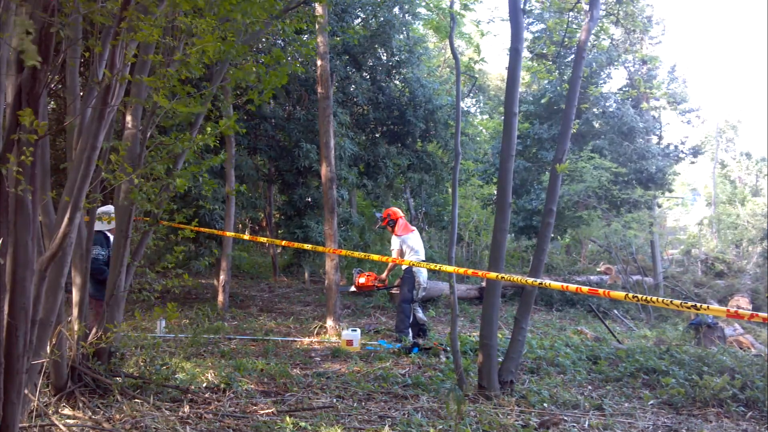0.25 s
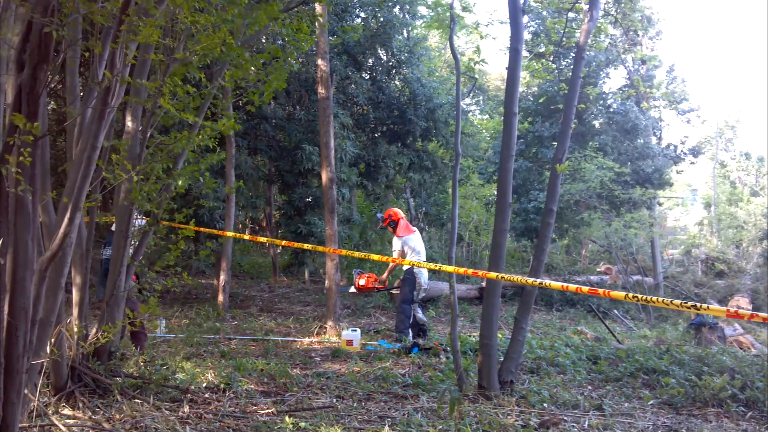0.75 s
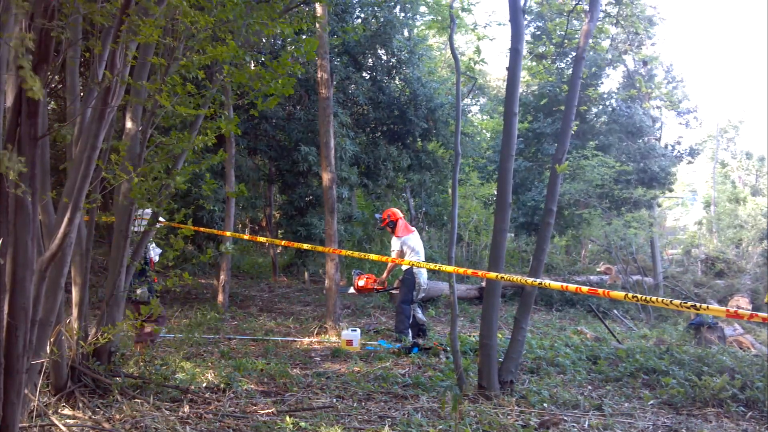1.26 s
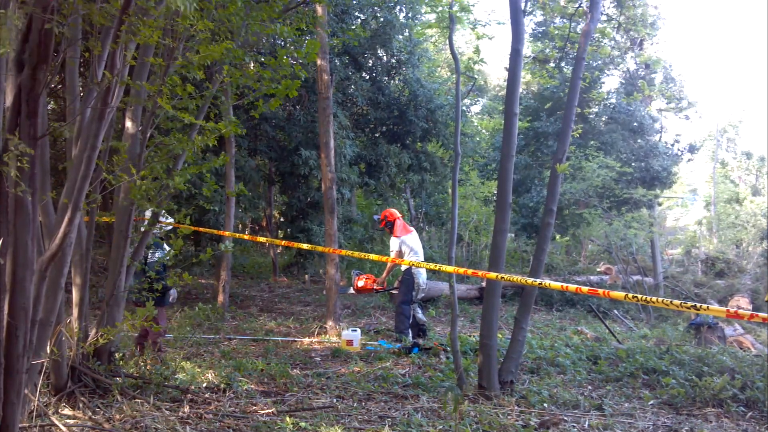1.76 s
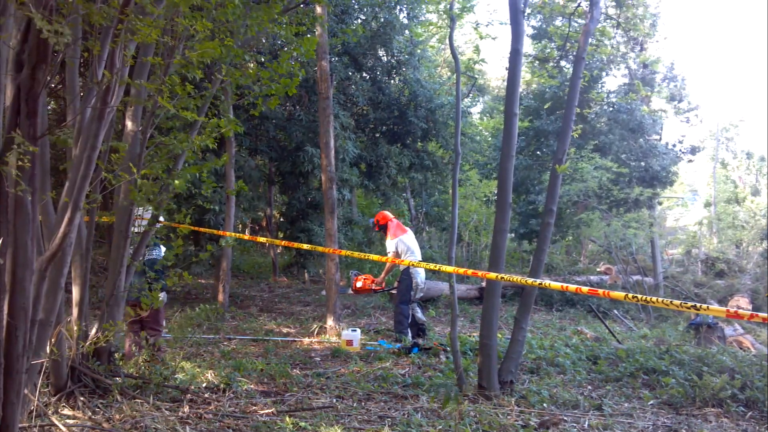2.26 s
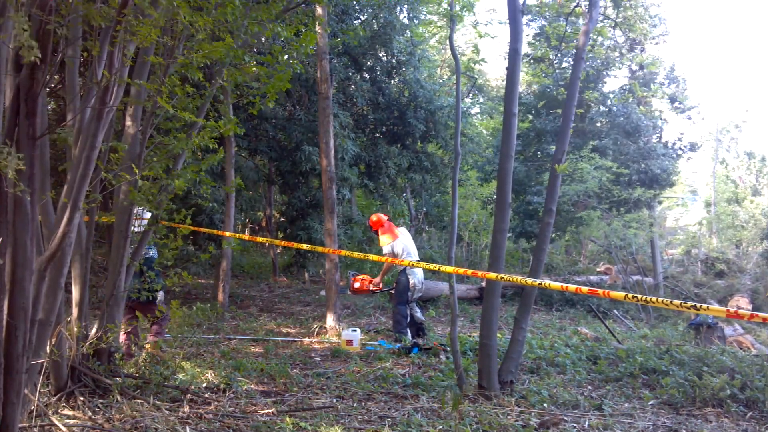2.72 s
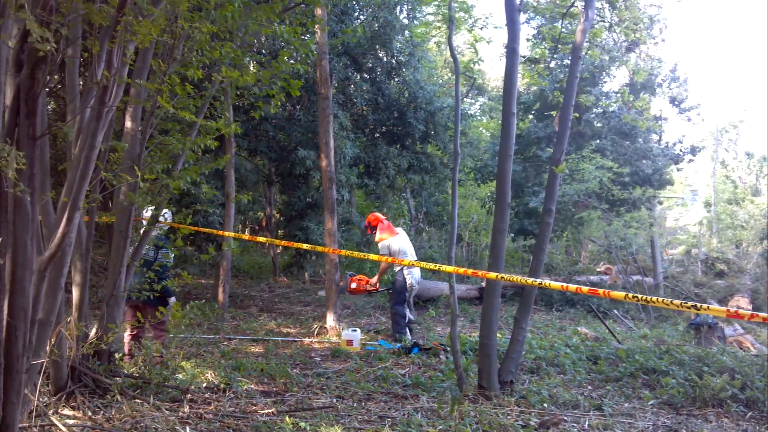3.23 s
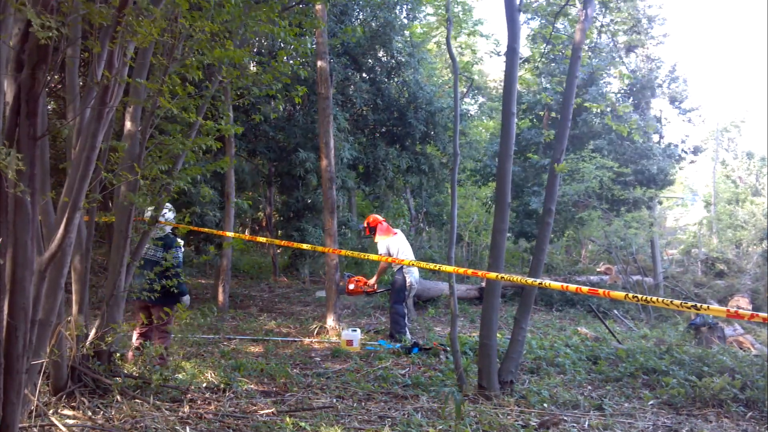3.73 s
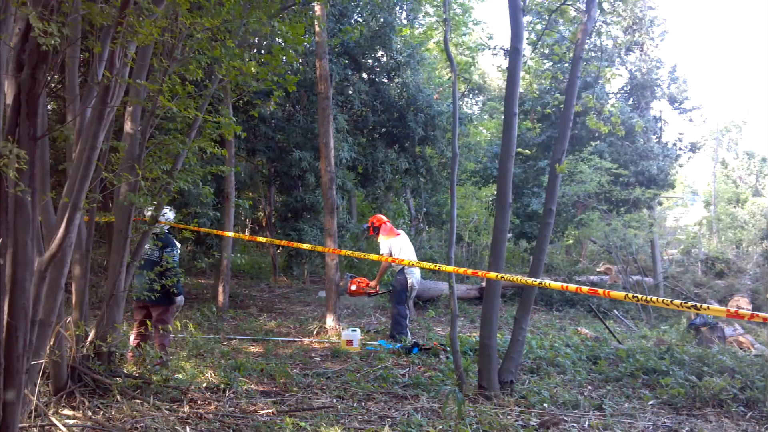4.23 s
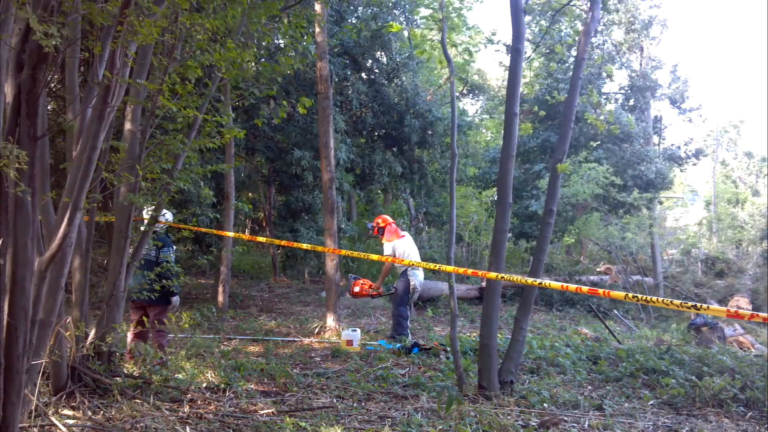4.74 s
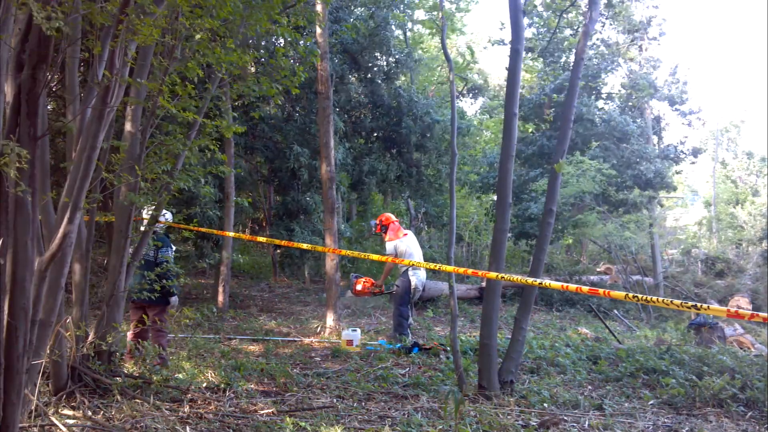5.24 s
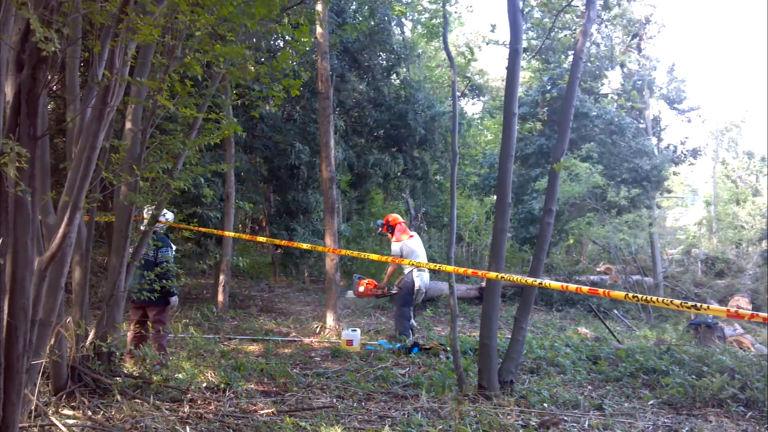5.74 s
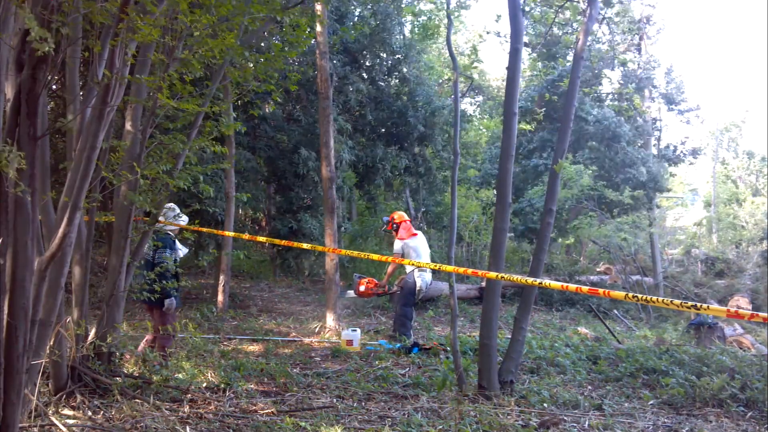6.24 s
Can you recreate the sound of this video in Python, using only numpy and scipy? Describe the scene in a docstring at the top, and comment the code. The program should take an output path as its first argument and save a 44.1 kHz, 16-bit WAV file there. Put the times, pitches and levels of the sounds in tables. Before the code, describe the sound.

A petrol chainsaw works at a trunk in open woodland, heard from some metres away in stereo. It putters at idle, picks up and cuts with a lumpy, stuttering drone, then revs into a loud even rasp, drops off and barks in three quick blips. Chain hiss and casing rattle follow the revs; soft low thumps and light wind bump the microphone, and a few twigs snap.

```python
"""In woodland, some metres from a stereo microphone, a two-stroke chainsaw works at a tree trunk.
On part throttle it mostly fires strongly only every second or third turn; then it revs up cleanly,
coasts down and is blipped three times. Impulses timed by the crank excite muffler and casing filters.
Filtered noise makes the chain's hiss, scattering trunks, snapping twigs and air on the microphone;
decaying tones in puffs of noise make soft thumps there."""
import sys
import numpy as np
from scipy import signal
from scipy.fft import rfft, irfft, next_fast_len
from scipy.io import wavfile
from scipy.ndimage import uniform_filter1d, map_coordinates

SR = 44100
rng = np.random.default_rng(int(sys.argv[2]) if len(sys.argv) > 2 else 0)


def digitize_waveform(pressure):
    """Quantize a signal to 16-bit integers and store it at the path in sys.argv[1].

    Rows of a 2-D input are taken as channels; values are limited to [-1, 1].
    """
    field = np.atleast_2d(pressure).T
    bounded = np.clip(field, -1, 1)
    quanta = np.round(bounded * 32767).astype(np.int16)
    wavfile.write(sys.argv[1], SR, quanta)


N = 285768

# spectral colour of the chain links, also lent to the twigs: f/Hz, relative level/dB
CHAIN_COLOUR = [(500, -9), (2000, -3.5), (3200, 0.5), (5000, 1), (6300, -2), (7200, 0), (9000, 1.5),
                (11000, -1.5), (13500, -4), (15000, -11), (16000, -25)]
# throttle blips: opening t/s, stumble duration/s, swell duration/s, closing t/s, exhaust level/dB
THROTTLE_BLIPS = [(5.55, 0.13, 0.12, 5.912, -16.5), (6.076, 0.0038, 0.035, 6.247, -15.5),
                  (6.441, 0.0067, 0.036, 6.507, -15)]
BITE_S, LIFT_S = 0.82, 5.11  # the chain enters the wood; the throttle is let go


def amp(db):
    """Decibels to amplitude ratio: 20 dB is a factor of ten."""
    return 10 ** (np.asarray(db) / 20)


def unit(x):
    """Normalise the mean square, so that x has rms 1."""
    return x / np.sqrt(np.mean(x ** 2) + 1e-20)


def along(points, hz):
    """Interpolate (f, value) points linearly on a logarithmic frequency axis."""
    f, v = np.transpose(points)
    return np.interp(np.log(hz + 1), np.log(f + 1), v)


def curves(rows):
    """Interpolate each column after the time linearly, one value per sample."""
    s, *columns = np.transpose(rows)
    return [np.interp(np.arange(N) / SR, s, column) for column in columns]


def wobble(rate):
    """Band-limited random fluctuation: a spline through rate random knots a second."""
    knots = rng.standard_normal(int(N * rate / SR) + 4)
    return map_coordinates(knots, [np.arange(N) * rate / SR])


def filtered(x, response):
    """Linear filtering: multiply the spectrum of x by a response of frequency."""
    m = next_fast_len(N + SR // 2)
    spectrum = rfft(x, m) * response(np.fft.rfftfreq(m, 1 / SR))
    return irfft(spectrum, m)[..., :N]


def coloured(x, points):
    """Spectral shaping by (f/Hz, level/dB) points, normalised to rms 1."""
    return unit(filtered(x, lambda hz: amp(along(points, hz))))


def ring(points, size=4096):
    """Minimum-phase impulse response of a (f/Hz, level/dB) colour, from its folded cepstrum."""
    cepstrum = irfft(np.log(amp(along(points, np.fft.rfftfreq(size, 1 / SR)))))
    cepstrum[1:size // 2] *= 2
    cepstrum[size // 2 + 1:] = 0
    return irfft(np.exp(rfft(cepstrum)))


def steady(x, size=4400):
    """Level equalisation: divide x by its short-time rms."""
    power = np.mean(np.atleast_2d(x) ** 2, axis=0)
    smooth_power = uniform_filter1d(uniform_filter1d(power, size), size // 2)
    return x / np.sqrt(np.abs(smooth_power) + 1e-12)


def ports(far_db):
    """Level difference between the left and right microphone ports, at equal mean power."""
    return unit(np.array([[1], [amp(far_db)]]))


def impulses(seconds, size):
    """Fractional delay: share each impulse linearly between two neighbouring samples."""
    at = np.clip(seconds * SR, 0, N - 2)
    whole = at.astype(int)
    early = np.bincount(whole, size * (1 - at + whole), N)
    late = np.bincount(whole + 1, size * (at - whole), N)
    return early + late


def by_speed(speed, top_db, knee_hz, db_per_octave):
    """Power law of source level: so many decibels per octave of crank speed, up to a knee."""
    return top_db + db_per_octave * np.log2(np.minimum(speed / knee_hz, 1))


def gate(start, end, rise, fall):
    """Envelope from 0 to 1: a linear ramp from start, an exponential relaxation after end."""
    t = np.arange(N) / SR
    return np.clip((t - start) / rise, 0, 1) * np.exp(-np.maximum(t - end, 0) / fall)


def shaking(fire, decay, share):
    """Damped vibration envelope: each firing jolts the saw, and the jolt dies away exponentially."""
    jolts = signal.fftconvolve(fire, np.exp(-np.arange(SR // 20) / SR / decay))[:N]
    share = np.clip(share, 0, 1)
    return steady(1 - share + share * steady(jolts))


def breeze():
    """Turbulent pressure at the microphone: flickering low noise whose power swells in Gaussian gusts."""
    # gusts: centre t/s, half length/s, peak level before flutter/dB
    gusts = [(0.12, 0.15, -40), (0.595, 0.41, -32.5), (1.75, 0.38, -37), (3.097, 0.35, -36),
             (5.897, 0.32, -31)]
    # spectral colour of the moving air: f/Hz, relative level/dB
    air_colour = [(25, -50), (60, -11.5), (120, -5), (250, -11), (600, -18.5), (2000, -34), (15000, -36)]
    breeze_db = -43.5  # between gusts, before flutter
    t = np.arange(N) / SR
    power = amp(breeze_db) ** 2
    for s, half, db in gusts:
        power = power + amp(db) ** 2 * np.exp(-((t - s) / half) ** 2)
    flutter_db = 3 * wobble(14)
    air = coloured(rng.standard_normal((2, N)), air_colour)
    return np.sqrt(power) * amp(flutter_db) * air * ports(far_db=-0.5)


def woods(x):
    """Diffuse reverberation: trunks and leaves scatter noise tails, one to each port."""
    # decay time of the scattered sound: f/Hz, t60/s
    decay_times = [(150, 0.64), (800, 0.31), (4000, 0.2), (14000, 0.055)]
    hz, t, z = signal.stft(rng.standard_normal((2, SR // 2)), SR, nperseg=256)
    decay = amp(-60 * t / along(decay_times, hz)[:, None])
    tail = signal.istft(z * decay, SR, nperseg=256)[1]
    return signal.fftconvolve(x[None], tail / np.linalg.norm(tail[0]), axes=1)[:, :N]


def twigs(t60=0.038):
    """Brittle fracture: dry twigs crack on the forest floor in sudden noise that decays exponentially."""
    # cracks: onset t/s, relative level/dB
    cracks = [(0.0764, -22), (0.1426, -25.5), (0.317, -21.5), (0.376, -17), (5.587, -16), (5.6264, -13.5)]
    envelope, t = np.zeros(N + SR), np.arange(SR // 8) / SR
    for s, db in cracks:
        envelope[round(s * SR):][:len(t)] += amp(db - 8 - 60 * t / t60)
    noise = coloured(rng.standard_normal((2, N)), CHAIN_COLOUR)
    return envelope[:N] * noise * ports(far_db=-2)


def thumps():
    """Transient tones on the microphone, in puffs of air and a quarter cycle apart at the two ports."""
    # knocks: nominal t/s, relative level/dB, pitch f/Hz, time for the swell to peak/s
    knocks = [(0.052, -18.5, 163, 0.0065), (0.117, -19.5, 187, 0.0093), (0.159, -22.5, 147, 0.0062),
              (0.203, -22.5, 223, 0.0065), (0.405, -13.5, 177, 0.007), (0.41, -18, 337, 0.0037),
              (0.464, -21, 320, 0.0063), (0.52, -15, 286, .006), (0.532, -14, 130, 0.0074),
              (0.544, -9.5, 382, 0.0042), (0.57, -11.5, 211, 0.0084), (0.594, -13, 140, 0.0078),
              (0.603, -17, 333, 0.0041), (0.613, -12.5, 188, 0.0064), (0.799, -19, 130, 0.0079),
              (0.967, -15, 201, 0.0058), (0.981, -17, 150, 0.006), (1.683, -20.5, 189, 0.006),
              (1.702, -23, 141, 0.006), (1.78, -19.5, 238, 0.0056), (1.793, -19, 161, 0.0073),
              (2.234, -32, 149.8, 0.0075), (2.416, -25.5, 160, 0.009), (2.978, -14.5, 129, 0.0094),
              (3.044, -15, 147, .009), (3.361, -26, 88, .012), (4.425, -31, 169.7, 0.0052),
              (5.649, -26, 200.7, 0.0084)]
    # spectral colour of the puffs: f/Hz, relative level/dB
    puff_colour = [(25, -39), (60, -18), (110, -3), (180, -1.5), (300, -7), (480, -12.5), (800, -46),
                   (2000, -66)]
    out, t = np.zeros((2, N + SR)), np.arange(SR // 8) / SR
    puffs = steady(coloured(rng.standard_normal((2, N)), puff_colour), size=600)
    rough = .33  # share of the power that is noise
    quadrature = np.array([[0], [np.pi / 2]])
    for s, db, hz, life in knocks:
        at = round((s - .003) * SR)  # the swell begins 3 ms ahead of the nominal time
        tone = np.sqrt(2) * np.sin(2 * np.pi * (hz * t + rng.random()) + quadrature)
        swell = (t / life * np.exp(1 - t / life)) ** 2
        mixture = np.sqrt(1 - rough) * tone + np.sqrt(rough) * puffs[:, at:at + len(t)]
        out[:, at:at + len(t)] += amp(db) * swell * mixture
    return out[:, :N] * ports(far_db=-2.5)


def whine(turns, speed):
    """Harmonics of rotation: fan and chain drive sing on multiples of the crank speed at high revs."""
    # harmonics: multiple of the crank speed, relative level/dB
    orders = [(7, -14), (9, -7), (10, -15), (11, -13), (12, -6), (14, -13), (15, -12)]
    whine_db = -30
    fast = np.clip((speed - 115) / 35, 0, 1)  # silent below 115 Hz, full from 150 Hz
    waver = .6  # phase wander, rad
    tones = 0
    for k, db in orders:
        level = amp(db + 3.1 * wobble(11))
        tones = tones + level * np.sin(2 * np.pi * np.round(k) * turns + waver * wobble(50))
    return amp(whine_db) * fast * tones * ports(far_db=-22)


def kerf(fire):
    """Friction noise in narrow bands: the cutters rasp the kerf's walls in spells, shaken by the firings."""
    # rasps: start t/s, end t/s, centre f/Hz, bandwidth/Hz, level/dB
    rasps = [(2.5, 3.8, 1610, 172, -40.5), (2.799, 3.795, 1157, 161, -38), (4.544, 5.112, 1660, 170, -38)]
    rise_s, fall_s = 0.22, 0.12
    sound = 0
    for start, end, hz, width, db in rasps:
        band = filtered(rng.standard_normal((2, N)), lambda f: 1 / (1 + (2 * (f - hz) / width) ** 2) ** 2)
        sound = sound + amp(db) * gate(start, end, rise_s, fall_s) * unit(band)
    return sound * shaking(fire, decay=0.008, share=0.4) * ports(far_db=-2.5)


def chain(fire, level_db, grain_db=2):
    """Impact noise exciting modes: links patter densely along the guide bar and ring its resonances."""
    # modes of the guide bar: f/Hz, bandwidth/Hz, relative level/dB
    bar_modes = [(3990, 49, 12), (4226, 25, 19.5), (7200, 130, -9)]
    # ringing of the bar: t/s, level relative to the chain/dB
    bar_ringing = [(.2, -18), (.6, -12), (1.3, -9.5), (1.8, -10.5), (3.5, -12), (4.3, -10.5), (4.8, -14),
                   (6, -9.5)]
    links = rng.standard_normal((2, N)) * amp(grain_db * wobble(1500) + 0.53 * wobble(40))
    links = links * shaking(fire, decay=0.02, share=0.1)

    def modes(f):
        return sum(amp(db) * 1j * f * w / (c * c - f * f + 1j * f * w) for c, w, db in bar_modes)

    patter = amp(2) * coloured(links, CHAIN_COLOUR)
    ringing = amp(curves(bar_ringing)[0]) * unit(filtered(links[::-1], modes))
    return amp(level_db) * (patter + ringing) * ports(far_db=-10.5)


def crank():
    """First-order relaxation of speed/Hz: set in the cut, sinking when shut, climbing in each blip."""
    # feathered throttle in the cut: t/s, crank speed f/Hz
    cut_speed = [(0.35, 47.3), (0.5, 82.76), (0.6, 85.5), (0.7, 104.1), (0.8, 118.4), (0.92, 124.6),
                 (1.23, 122.1), (1.53, 132.8), (1.72, 108), (1.88, 96.5), (2.22, 91.64), (2.45, 92.2),
                 (2.56, 94.1), (2.78, 88.44), (3.0, 83.37), (3.53, 87.13), (3.6, 84), (3.72, 85.3),
                 (3.86, 116.2), (3.94, 129.7), (4.02, 138.6), (4.17, 142.2), (4.49, 152.3), (4.74, 158.5),
                 (5.11, 161.4)]
    idle_hz, hang_s, coast_s = 47.23, .041, .245  # speed hangs briefly, then sinks towards idle
    ceiling_hz, climb_s = 245, .37  # limit and time constant of an open throttle
    t = np.arange(N) / SR
    speed, = curves(cut_speed)

    def coast(speed, shut):
        sinking = np.exp(-np.maximum(t - shut - hang_s, 0) / coast_s)
        return np.where(t > shut, idle_hz + (np.interp(shut, t, speed) - idle_hz) * sinking, speed)

    speed = coast(speed, LIFT_S)
    for opens, stumble, _, closes, _ in THROTTLE_BLIPS:
        catches = opens + stumble
        gap = ceiling_hz - np.interp(catches, t, speed)
        climb = ceiling_hz - gap * np.exp(-np.maximum(t - catches, 0) / climb_s)
        speed = coast(np.where(t > catches, climb, speed), closes)
    return speed


def effort(speed):
    """Load sets exhaust level/dB: pull in the cut, mutter off throttle, stumble and bark in each blip."""
    # pull through the cut: t/s, exhaust level/dB
    pull = [(0.3, -42.5), (0.51, -24), (0.67, -28), (0.75, -24), (0.98, -27), (1.5, -23), (1.66, -27.5),
            (2.73, -23.5), (3.23, -24.5), (3.39, -23), (3.7, -24), (3.83, -18.5), (4.27, -21.5),
            (4.48, -17.5), (5.01, -17.5), (5.1, -18.5)]
    idle_db, coast_db, stumble_db = -40, -38, -17
    mutter_db = -31  # from the end of the first blip the rich mixture keeps burning
    open_s, shut_s = 0.069, 0.028  # throttle ramp, and decay after shutting
    burn_on_s = 0.0019  # the last charges still burn after the throttle shuts
    cut_db, = curves(pull)
    cut = amp(np.maximum(cut_db, idle_db)) * gate(-1, LIFT_S + burn_on_s, open_s, shut_s)
    blips = 0
    for opens, stumble, swell, closes, db in THROTTLE_BLIPS:
        stumbling = amp(stumble_db) * gate(opens, closes, open_s, shut_s)
        barking = amp(db) * gate(opens + stumble, closes + burn_on_s, swell, shut_s)
        blips = blips + np.maximum(stumbling, barking)
    mutter = np.where(np.arange(N) / SR > THROTTLE_BLIPS[0][3], amp(mutter_db), amp(coast_db))
    speed_db = by_speed(speed, top_db=0, knee_hz=116, db_per_octave=12.5)
    free = np.maximum(blips, mutter) * amp(speed_db)
    return 20 * np.log10(np.maximum(cut, free))


def firings(when):
    """Subharmonic firing: one impulse a turn; a strong one fouls the next, which burn weakly and late."""
    # pattern: from t/s, turns per strong firing, next turn's level/dB, its lateness/s, level scatter/dB
    pattern = [(0, 2, -4, 0.0015, 5.5), (.45, 2, -2, 0, 0.5), (.62, 1, 0, 0, .25), (.86, 3, -8, .0002, .6),
               (1.28, 2, 0, 0.00013, 0.3), (1.6, 3, -3, 0.0004, 0.5), (1.85, 3, -6, 0.0015, 2.4),
               (2.58, 2, -4.5, .0006, 1.5), (2.94, 2, -4.5, .0003, 1.3), (3.72, 1, 0, 0, -0.1),
               (5.15, 1, 0, 0.00012, 2), (5.72, 1, -3, 0, 0.4), (5.92, 1, 0, 0, 2.5), (6.08, 1, 0, 0, .26),
               (6.26, 1, 0, 0, 2.5)]
    start, period, weak_db, late, scatter_db = np.transpose(pattern)
    row = np.clip(np.searchsorted(start, when) - 1, 0, None)
    chance = rng.standard_normal((len(when), 2))
    cycle = np.maximum(np.round(period[row]), 1)
    # 0 for a strong firing, 1 for the turn after it, then recovering
    fouled = -np.arange(len(when)) % cycle / np.maximum(cycle - 1, 1)
    size = amp(fouled * weak_db[row] + scatter_db[row] * chance[:, 0])
    # uneven burning also shifts each pulse a little
    shift = .00003 * scatter_db[row] * chance[:, 1]
    return impulses(when + shift + late[row] * fouled, size)


def pumping(fire, level_db):
    """Volume displacement: the piston's puff of air each turn is the impulse train through a low filter."""
    # spectral colour of one puff: f/Hz, relative level/dB
    puff_colour = [(50, -32), (85, -5.5), (125, 1.5), (165, -0.5), (230, 2.5), (320, -8), (500, -1.5),
                   (900, -12), (2000, -52.5), (5000, -52)]
    puffs = steady(signal.fftconvolve(fire, ring(puff_colour))[:N])
    return amp(level_db) * puffs * ports(far_db=0.5)


def clatter(fire, level_db, clean, decay=0.012, rough_share=0.26, clean_share=0.46):
    """Repeated impact response: one knock rattles the casing at every firing, mixed by power with gas."""
    # spectral colour of rattle and gas: f/Hz, relative level/dB
    casing_colour = [(100, -40), (300, -12.5), (600, 3.5), (1000, 2), (1300, 0), (1700, -2), (2400, 3.5),
                     (3300, -9.5), (5000, -11), (10000, -25)]
    t = np.arange(SR // 40) / SR
    knock = rng.standard_normal((2, len(t))) * np.exp(-t / decay)
    knocks = signal.fftconvolve(fire[None], knock, axes=1)[:, :N]
    rattle = steady(coloured(knocks, casing_colour))
    gas = coloured(rng.standard_normal((2, N)), casing_colour) * shaking(fire, decay=0.016, share=0.064)
    # clean firing favours the rattle
    share = np.clip(rough_share + clean * (clean_share - rough_share), 0, 1)
    return amp(level_db) * (np.sqrt(share) * rattle + np.sqrt(1 - share) * gas) * ports(far_db=-4.5)


def crackle(fire, level_db):
    """Amplitude-modulated noise: squared firing jolts make strong firings spit bright bursts."""
    # spectral colour of the spit: f/Hz, relative level/dB
    spit_colour = [(300, -24), (1000, 1), (1800, 1.5), (4200, -1.5), (7000, -9), (14000, -8)]
    spit_db = -4.5  # relative to the clatter
    t = np.arange(SR // 40) / SR
    jolts = signal.fftconvolve(fire, np.exp(-t / .007))[:N]
    spit = coloured(rng.standard_normal((2, N)), spit_colour) * steady(jolts ** 2)
    return amp(level_db + spit_db) * spit * ports(far_db=-4.5)


def near_echoes(x):
    """All-pass reflection: a quick train of fading echoes off ground and trunk leaves the colour alone."""
    spacing, direct = 0.0026, 0.83  # echo spacing in s, gain of the direct pulse

    def lag(hz):
        return np.exp(-2j * np.pi * hz * spacing)

    return filtered(x, lambda hz: (direct + lag(hz)) / (1 + direct * lag(hz)))


def resonate(x):
    """Time-varying resonance: shift a band to zero frequency, low-pass it, shift it back and add it."""
    # muffler's main resonance, wandering as the saw is worked: t/s, f/Hz, added level/dB
    resonance = [(0.5, 780, -4), (1.0, 745, -4), (1.5, 780, -4), (1.9, 820, 4), (2.5, 813, 1),
                 (2.9, 784.5, -5), (3.6, 796, -8), (3.9, 825, -10), (4.4, 779, -13), (5.0, 803, -5),
                 (5.4, 681.6, -7)]
    width_hz = 70
    hz, db = curves(resonance)
    spin = np.exp(2j * np.pi * np.cumsum(hz) / SR)
    pole = np.exp(-np.pi * width_hz / SR)
    ringing = np.real(spin * signal.lfilter([1 - pole], [1, -pole], x / spin))
    return x + 2 * amp(db) * ringing


def exhaust(fire, speed, level_db, clean, surge, cutting):
    """Source-filter principle: firing pulses and turbulent gas ring the muffler and echo among trees."""
    # one exhaust pulse; hot, fast gas sharpens its note: f/Hz, level at low revs/dB, at top revs/dB
    pulse = [(45, -37, -37), (88, -7.5, -14), (141, 2.5, -7), (175, -5, -3), (350, -20.5, -36),
             (440.9, -7.5, -11), (558, -7, -16), (604, 2, -5), (703, -3.5, 1), (735, 0.5, 0), (799, -1, 1),
             (832, -9, -5), (1020, -11, -13.5), (1190, -18, -36), (1649, -19, -29.5), (1890, -15, -13),
             (1950, -20, -40), (2290, -43, -30), (2430, -40, -36), (9000, -31, -40)]
    # short, broad pulse of an engine gathering speed: f/Hz, level in the wood/dB, running free/dB
    surge_pulse = [(45, -29, -24), (90, -2, 2), (141, 3.5, 3.5), (285.8, -14.5, -12), (420, -6.5, -4.5),
                   (595, -1.5, 3), (800, 4, 2), (863, -1.5, -5.5), (1010, -7, -7.5), (1240, -7, -15),
                   (1450, -16, -14), (1700, -10, -12.5), (1840, -17, -12), (2320, -17, -27),
                   (4000, -16, -21), (9000, -27, -25)]
    gas_rough_db, gas_clean_db = -13, -20  # turbulent gas relative to the pulses
    tail_rough_db, tail_clean_db = -6.5, -15  # woodland tail, stronger when the burning is rough
    gas_db = gas_rough_db + clean * (gas_clean_db - gas_rough_db)
    gas = rng.standard_normal(N) * shaking(fire, decay=0.0052, share=0.82)
    flow = steady(fire) + amp(gas_db) * gas

    def muffler(table):
        hz, *colours = np.transpose(table)
        return [steady(signal.fftconvolve(flow, ring(np.c_[hz, db]))[:N]) for db in colours]

    low, top = muffler(pulse)
    loaded, free = muffler(surge_pulse)
    hot = np.clip((speed - 128) / 25, 0, 1)
    even = (1 - hot) * low + hot * top
    punch = cutting * loaded + (1 - cutting) * free
    bark = steady(resonate(near_echoes((1 - surge) * even + surge * punch)))
    tail = amp(tail_rough_db + clean * (tail_clean_db - tail_rough_db))
    sound = (bark * ports(far_db=-5.5) + tail * woods(bark)) / np.hypot(1, tail)
    return amp(level_db - 3.5) * np.hypot(1, amp(gas_db)) * sound


def scene():
    """Superposition of sources: the crank times the saw's parts; speed and load set their levels."""
    bite_fade_s, bite_db = 0.1, -32  # the chain's added noise in the wood
    rough_db, clean_db = -28.5, -18  # exhaust levels of rough and of fully clean burning
    surge_hz_per_s, coast_hz_per_s = 190, 140  # rise and fall of speed that count in full
    load_db, surge_db = 1.5, 1.6  # the casing rattles harder in the wood, and when gathering speed
    clutch_hz = 58  # below this speed the chain only shivers in its groove: its level falls no further
    speed = crank()
    exhaust_db = effort(speed)
    cutting = gate(BITE_S, LIFT_S, bite_fade_s, bite_fade_s)
    gain = uniform_filter1d(np.gradient(speed) * SR, size=2200)  # Hz per s
    surge = np.clip(gain / surge_hz_per_s, 0, 1)
    coasting = np.clip(-gain / coast_hz_per_s, 0, 1) * (1 - cutting)
    # a hard pull, a surge or a fast coast each gives the clean character
    pulling = np.clip((exhaust_db - rough_db) / (clean_db - rough_db), 0, 1)
    clean = np.maximum(pulling, np.maximum(coasting, surge))

    clatter_db = by_speed(speed, top_db=-30, knee_hz=131, db_per_octave=10.6)
    clatter_db = clatter_db + load_db * cutting + surge_db * surge
    running_db = by_speed(np.maximum(speed, clutch_hz), top_db=-29, knee_hz=145, db_per_octave=10.96)
    chain_db = 20 * np.log10(np.hypot(amp(running_db), amp(bite_db) * cutting))
    pump_db = by_speed(speed, top_db=-37, knee_hz=114, db_per_octave=9.3)

    turns = np.cumsum(speed * (1 + 0.001496 * wobble(25))) / SR
    when = np.interp(np.arange(1, int(turns[-1]) + 1), turns, np.arange(N) / SR)
    fire = firings(when)
    surroundings = breeze() + twigs() + thumps()
    cut = whine(turns, speed) + kerf(fire) + chain(fire, chain_db)
    engine = pumping(fire, pump_db) + clatter(fire, clatter_db, clean) + crackle(fire, clatter_db)
    engine = engine + exhaust(fire, speed, exhaust_db, clean, surge, cutting)
    return surroundings + cut + engine


def record(dry, cross=0.99):
    """Delay-and-subtract widening: each port loses a late copy of the other, then the band is limited."""
    # left-right balance of the stereo pickup: f/Hz, left-right level difference/dB
    balance = [(80, -3.5), (250, 0.5), (400, 4.5), (560, 4), (800, 1), (1100, 1.5), (1800, -9), (2700, 2),
               (4500, -0.5), (9000, -3), (14000, -1.5)]
    top_hz = 15850
    delay = 16 / SR
    late = filtered(dry[::-1], lambda hz: np.exp(-2j * np.pi * hz * delay))
    wide = dry - min(cross, 1) * late
    return filtered(wide, lambda hz: amp(np.outer([.5, -.5], along(balance, hz))) * (hz < top_hz))


dry = scene()
out = record(dry)
digitize_waveform(out)
```